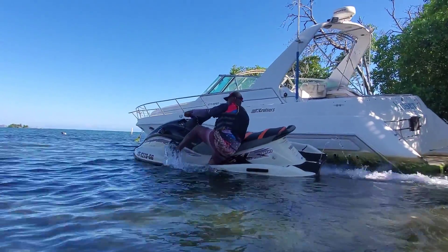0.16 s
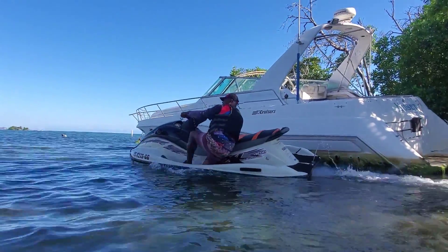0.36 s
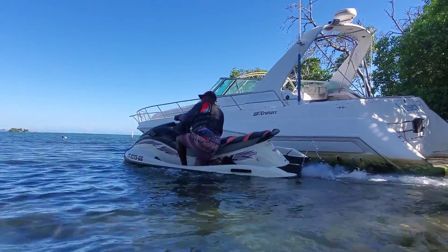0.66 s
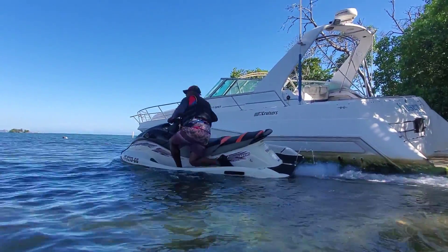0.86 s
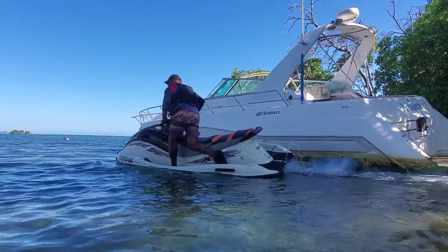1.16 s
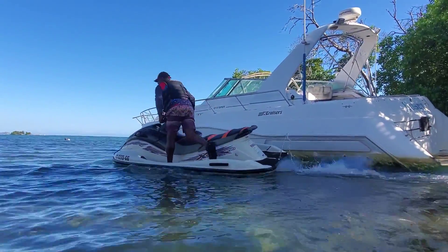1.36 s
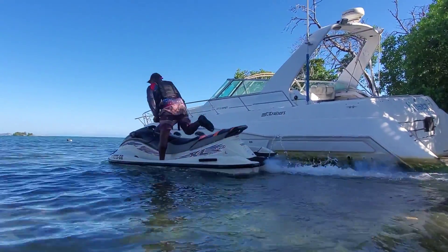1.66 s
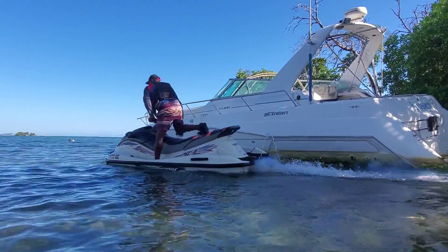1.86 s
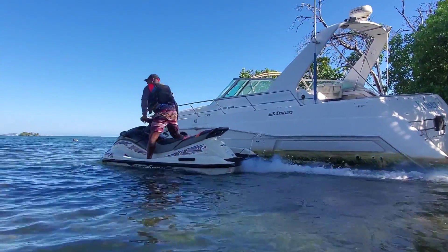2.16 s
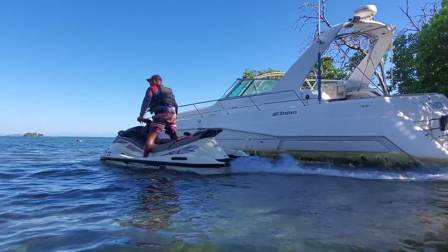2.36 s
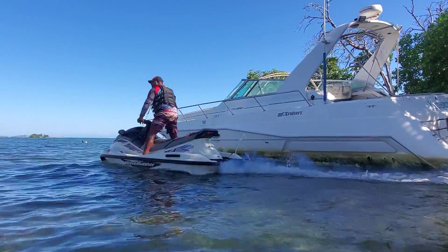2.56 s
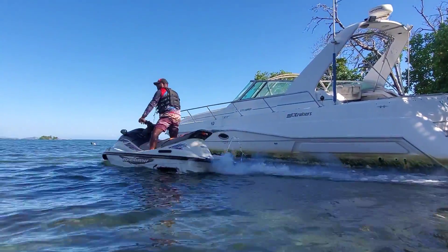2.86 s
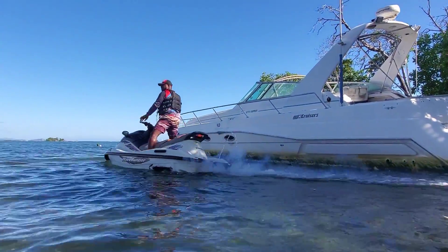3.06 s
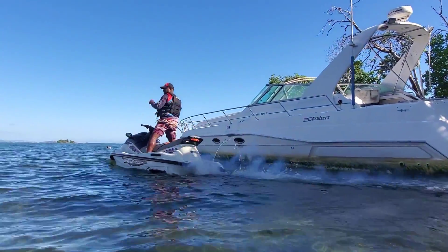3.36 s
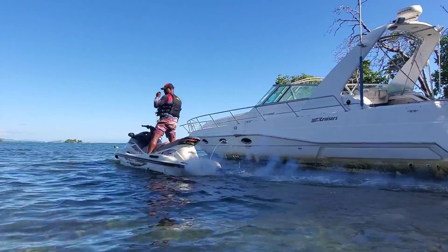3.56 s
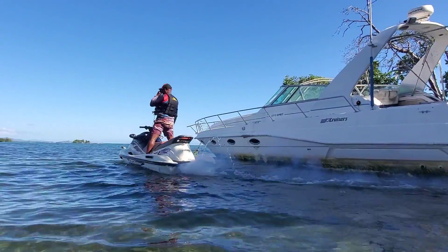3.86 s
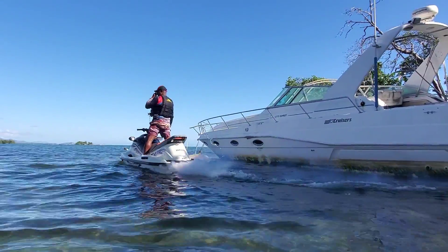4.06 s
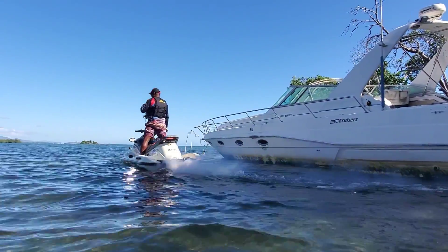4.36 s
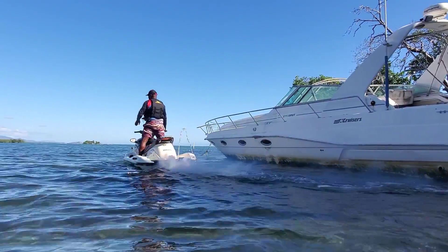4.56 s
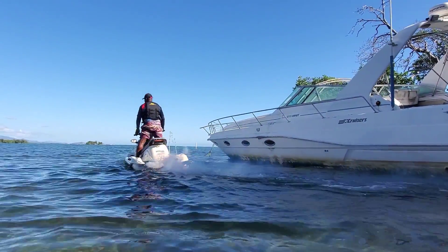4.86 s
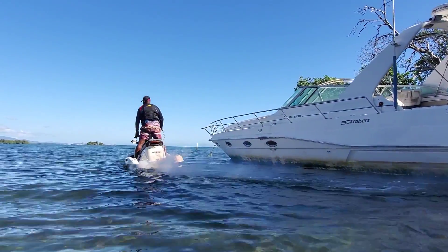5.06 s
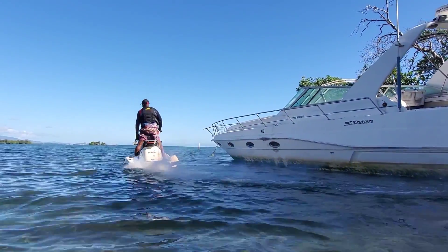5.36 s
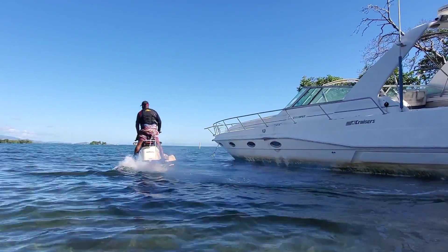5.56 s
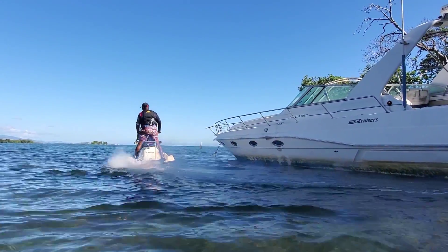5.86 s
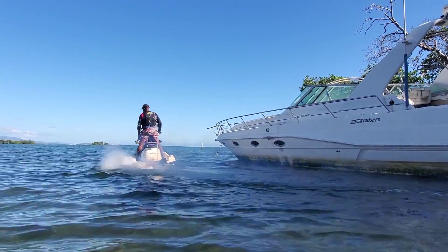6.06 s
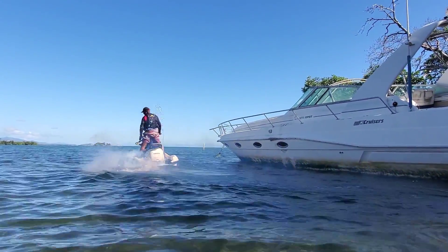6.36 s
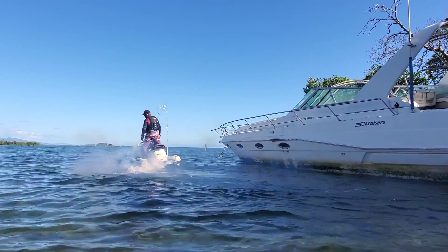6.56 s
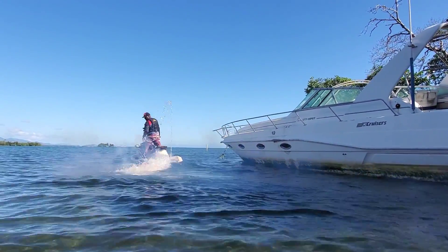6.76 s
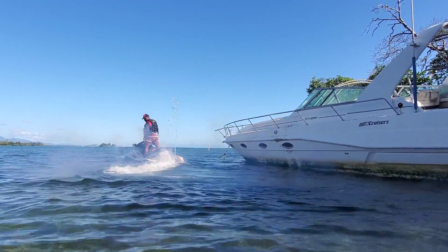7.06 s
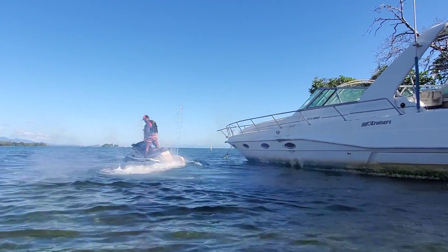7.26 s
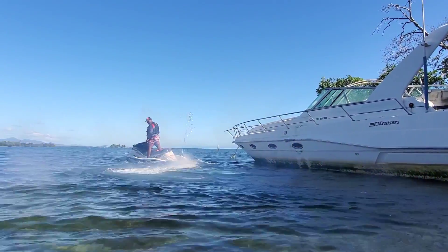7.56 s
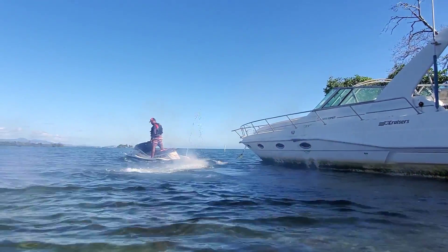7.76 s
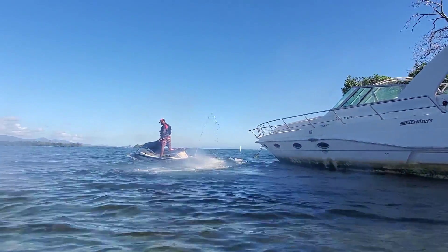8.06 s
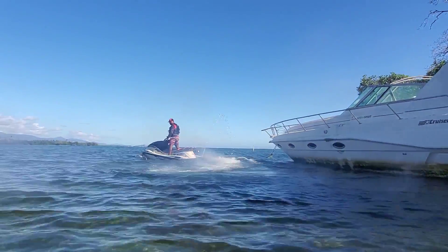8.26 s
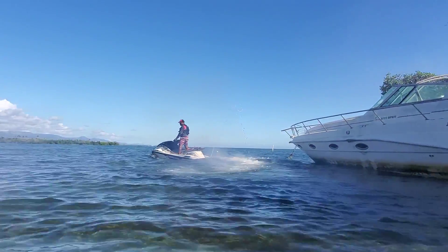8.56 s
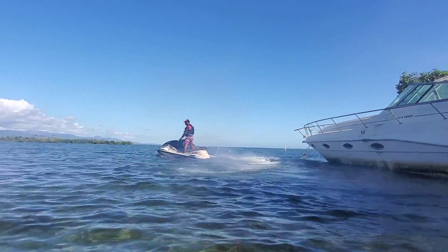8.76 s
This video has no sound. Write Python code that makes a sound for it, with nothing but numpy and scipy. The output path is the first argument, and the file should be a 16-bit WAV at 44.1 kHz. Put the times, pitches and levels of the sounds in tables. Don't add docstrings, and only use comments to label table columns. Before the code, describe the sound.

Outdoors on calm water, low hollow exhaust burps with spluttering wet edges come irregularly over hull rumble and churning jet water. They become even, falter, then race closer together. They blend into a buzzing engine drone with sliding low tones as the craft climbs and recedes; finally its pitch jumps, a whine emerges and hissing spray rises. Close, dry open-air stereo pickup, with a faint reflection off a boat hull.

```python
import sys
import numpy as np
from scipy import signal
from scipy.fft import rfft, irfft, next_fast_len
from scipy.io import wavfile
from scipy.ndimage import uniform_filter1d, minimum_filter1d

SR = 44100
rng = np.random.default_rng(int(sys.argv[2]) if len(sys.argv) > 2 else 0)


def invert_db(x):
    u = np.asarray(x, float) / 20
    return 10 ** u


def waveform_to_disk(signal):
    frames = np.transpose(np.atleast_2d(signal))
    scaled = np.clip(frames, -1, 1) * 32767
    samples = np.round(scaled).astype(np.int16)
    wavfile.write(sys.argv[1], SR, samples)


N = 392931
SIZE = next_fast_len(N + SR // 4)
HZ = np.maximum(np.arange(SIZE // 2 + 1) * SR / SIZE, 1)
STERN_ROUND_S = 1.3
UNDER_LOAD_S = 5.5

# t/s, gas pocket f/Hz, pipe f/Hz, boom level/dB
OUTLET_PATH = [(0, 133.7, 637.4, -7), (1.3, 134.6, 609.5, -7), (1.8, 133.7, 519.5, -3.5),
               (2.702, 143.6, 473, -5), (3.298, 106.2, 454.3, -12), (4.2, 117.4, 474.4, -10.5),
               (4.701, 112.9, 534.6, -6), (5.501, 111.2, 562, -6.5), (6.2, 110, 462, -13.5)]
# t/s, bark level/dB, boom level/dB, splutter level/dB
IDLE_BURPS = [(0.035, -11, -7.5, -23.5), (0.128, -10, -7, -22), (0.249, -16, -4, -28.5),
              (0.332, -13, -2.5, -21), (0.446, -15.5, -6, -22.5), (0.527, -5, -1, -17),
              (0.643, -19.5, -25, -37.5), (0.706, -23, -30, -33.5), (0.747, -16.5, -6, -23.5),
              (0.865, -17, -18, -26), (0.937, -13.5, -38, -28.5), (0.968, -8, -14, -32),
              (1.083, -15, -14.5, -30.5), (1.112, -19, -10, -27.5), (1.185, -17.5, -8.5, -24),
              (1.264, -5, -0.5, -13.5), (1.374, -14, -9.5, -23.5), (1.442, -24, -6, -23),
              (1.463, -10.5, -6, -20.5)]
STUMBLE_BURPS = [(2.741, -11, -9, -18.5), (2.805, -13.5, -10.5, -21), (2.852, -5.5, -8, -27.5),
                 (2.907, -8.5, -15, -24.5), (2.964, -13.5, -32, -25), (3.026, -10, -14, -33.5),
                 (3.064, -5, -9.5, -22), (3.132, -12, -41, -26.5), (3.205, -13, -34, -23.5),
                 (3.255, -25, -20, -29.5), (3.337, -15, -23, -29), (3.394, -16.5, -33, -35),
                 (3.444, -12.5, -17, -50.5), (3.497, -16.5, -23.5, -33.5), (3.557, -17, -13.5, -38.5),
                 (3.649, -8.5, -10.5, -27.5), (3.715, -9.5, -8, -37.5), (3.81, -7.5, -6.5, -32.5),
                 (3.883, -7, -13.5, -30), (3.953, -12.5, -16.5, -27), (4.006, -3, -8.5, -24.5),
                 (4.103, -2.5, -11.5, -25), (4.164, -3.5, -14, -28.5)]
SECOND_KICKS = [
    (2.044, -16.5, -13.5, -25.5),
    (2.154, -10.5, -18, -21),
    (2.322, -8, -24, -27),
]
# t/s, bark level/dB, pipe f/Hz, outlet f/Hz, splutter level/dB re bark
EVEN_BURPS = [(1.572, -16, 556, 1110, -4), (1.643, -7, 583, 1076, -10), (1.722, -11.5, 568, 1060, -6),
              (1.811, -9, 538, 1355, -8.5), (1.884, -8.5, 542, 1190, -12), (1.961, -11.5, 521, 1290, -7),
              (2.063, -12, 491, 1370, -8.5), (2.129, -10, 473, 1350, -11.5), (2.203, -9.5, 501, 1110, -10),
              (2.291, -12.5, 546, 978, -5.5), (2.361, -8, 472, 1220, -15.5), (2.436, -11, 510, 1220, -9),
              (2.518, -11.5, 539, 1030, -7.5), (2.592, -6, 569, 1220, -19.5),
              (2.666, -14.5, 459, 1110, -8.5)]
CHARGE_BURPS = [(4.233, -2.5, 481, 1108, -17), (4.258, -8, 459, 1060, -33), (4.286, -3, 479, 1717, -26),
                (4.335, -7.5, 495, 1157, -23), (4.389, -7, 495, 1076, -10.5), (4.437, -13, 375, 1160, -17),
                (4.488, -8, 496, 1164, -20.5), (4.543, -9.5, 581, 1835, -12),
                (4.597, -11, 629, 1052, -16.5), (4.648, -4, 618, 1100, -20), (4.702, -6.5, 494, 1185, -18),
                (4.759, -12, 495, 1554, -19.5), (4.799, -4.5, 501, 1130, -23),
                (4.859, -5.5, 485, 1595, -17.5), (4.95, -5.5, 487, 1133, -26.5),
                (5.01, -8.5, 617, 1500, -17), (5.102, -5.5, 580, 1110, -17), (5.157, -16.5, 468, 1198, -14),
                (5.195, -10, 572, 1640, -22.5), (5.243, -7, 489.5, 1115, -23.5),
                (5.292, -14.5, 488, 1616, -17.5), (5.35, -8.5, 597, 1232, -25),
                (5.411, -11, 511, 1684, -17.5),
                (5.459, -7, 483, 1800, -22), (5.511, -9, 619, 1450, -28.5), (5.56, -5.5, 488, 1310, -18.5),
                 (5.617, -17, 497, 1384, -18.5), (5.655, -5.5, 683, 1220, -18.5),
                 (5.702, -3.5, 650, 1304, -27), (5.728, -9.5, 608, 1050, -23),
                 (5.765, -4, 597, 1116, -35.5), (5.817, -10.5, 660, 1195, -23),
                 (5.869, -24, 420, 1174, -17.5), (5.895, -16.5, 384, 1205, -15),
                 (5.927, -16, 476, 1345, -20.5), (5.97, -8, 506, 1256, -20), (6.036, -16.5, 511, 1243, -13),
                 (6.092, -12, 393, 1195, -21.5), (6.141, -8.5, 407, 1173, -18.5),
                 (6.186, -18, 419, 1190, -22.5), (6.247, -20, 425, 1220, -13)]


def burp_list():
    path_s, _, _, path_boom_db = np.transpose(OUTLET_PATH)
    burp_rows = [(*row, 0, 0) for row in IDLE_BURPS + STUMBLE_BURPS + SECOND_KICKS]
    for s, bark_db, pipe_hz, outlet_hz, under_db in EVEN_BURPS + CHARGE_BURPS:
        boom_db = np.interp(s, path_s, path_boom_db)
        boom_db += 0.35 * (bark_db + 6) + 2 * rng.standard_normal()
        burp_rows.append((s, bark_db + 0.5, boom_db, bark_db + under_db - 0.3, pipe_hz, outlet_hz))
    return burp_rows


# f/Hz, level/dB per Hz
BARK_COLOUR = [(140, -33), (230, -9.5), (253, -13.5), (280, -13), (323, -8), (351, -6.5), (388, 0),
               (489, -0.5), (719, -2), (790, -8), (890, -20.5), (950, -24), (1240, -44.5), (2090, -120)]
# f/Hz, level/dB per Hz
SPLUTTER_COLOUR = [(500, -31), (850, 3.5), (909, -1.5), (985, 4), (1070, 1.5), (1270, 0), (1330, -1),
                   (1450, -1), (1910, -0.5), (2170, -8.5), (2320, -24), (3040, -19), (3240, -30.5),
                   (3680, -43), (4780, -33.5), (8100, -120)]
# multiple of its pitch, level/dB
POCKET_OVERTONES = [(1.518, -13), (2.201, -24)]
# f/Hz, level/dB re bark
PIPE_MODES = [(288, -18), (705, -13)]
OUTLET_PITCHES = [973, 1023, 1110, 1160, 1220, 1350]


def burps():
    boom, ring, chirp, cracks, knocks, bark_gate, wet_gate, bright_gate = np.zeros((8, N + SR))
    t = np.arange(SR // 9) / SR
    turn = 2 * np.pi * t
    path_s, path_pocket_hz, path_pipe_hz, _ = np.transpose(OUTLET_PATH)
    for s, bark_db, boom_db, wet_db, pipe_hz, outlet_hz in burp_list():
        pitch_z, boom_z, trip_z, hold_z, bend_z, bright_z, *mode_z = rng.standard_normal(8)
        hidden = s < STERN_ROUND_S
        pipe_hz = pipe_hz or np.interp(s, path_s, path_pipe_hz) * (1 + 0.07 * bright_z)
        outlet_hz = outlet_hz or rng.choice(OUTLET_PITCHES)
        start = round(s * SR)
        at = slice(start, start + len(t))

        pocket_hz = np.interp(s, path_s, path_pocket_hz) * (1 + 0.04 * pitch_z)
        bubble = sum(invert_db(db) * np.sin(k * pocket_hz * turn) for k, db in [(1, 0)] + POCKET_OVERTONES)
        boom[at] -= invert_db(boom_db + 0.5) * burst(t, 0.00056, 0.015 + 0.011 * boom_z, 0.087) * bubble

        round_trip = 0.011 + 0.0014 * trip_z
        beats = invert_db(-9 * (t / round_trip % 1))
        trips = np.arange(4)
        knocks[start + (trips * round_trip * SR).astype(int)] -= invert_db(bark_db + 13 - 4 * trips)

        twin_hz = pipe_hz * (1 + 0.11 * np.sign(trip_z))
        pipe = np.sin(pipe_hz * turn) + invert_db(-11) * np.sin(twin_hz * turn)
        ring[at] -= invert_db(bark_db - 5) * burst(t, 0.00062, 0.021 + 0.0028 * hold_z, 0.093) * beats ** 0.92 * pipe
        for (hz, db), chance in zip(PIPE_MODES, mode_z):
            mode_db = bark_db + db + 4.65 * chance
            if hidden and hz < 400:
                mode_db += 6
            mode = np.sin(hz * (1 + 0.032 * bend_z) * turn)
            ring[at] -= invert_db(mode_db) * burst(t, 0.00043, 0.0049, 0.093) * mode

        sliding = np.sin(outlet_hz * turn * (1 + 0.8 * t * bend_z))
        chirp[at] += invert_db(wet_db - 1) * burst(t, 0.0003, 0.013, 0.07) * beats * sliding
        cracks[start] -= invert_db(wet_db + 18)
        bark_gate[at] += invert_db(bark_db - 17) * burst(t, 0.00026, 0.025 + 0.0014 * hold_z, 0.021) * beats
        splutter = invert_db(wet_db - 4.5) * burst(t, 0.0006, 0.016 + 0.005 * hold_z, 0.11) * np.sqrt(beats)
        wet_gate[at] += splutter
        brightness = np.clip(bright_z, -1.5, 1) + (outlet_hz > 1450) - hidden - 0.4
        bright_gate[at] += splutter * invert_db(4.5 * brightness)

    bark = bark_gate[:N] * rng.standard_normal((2, N)) + knocks[:N] * [[1], [0.3]]
    wet = cracks[:N] * [[1], [0.4]]
    for kind, gate in [("low", wet_gate), ("high", bright_gate)]:
        split = signal.butter(2, 1450, kind, fs=SR, output="sos")
        wet = wet + signal.sosfilt(split, gate[:N] * rng.standard_normal((2, N)))
    soften = signal.butter(2, [95, 1400], "band", fs=SR, output="sos")
    tone = signal.sosfilt(soften, boom + ring)[:N] * [[1], [0]] + chirp[:N] * [[1], [0.4]]
    direct = tone + colour(bark, BARK_COLOUR) + colour(wet, SPLUTTER_COLOUR)
    lag = round(0.035 * SR)
    echo = np.pad(direct, ((0, 0), (lag, 0)))[:, :N]
    return direct + invert_db(-12.5) * echo, wet_gate[:N]


# t/s, peak level/dB, f/Hz
IDLE_RINGS = [
    (0.034, -19.5, 960),
    (0.127, -19.5, 870),
    (0.251, -20, 1228),
    (0.331, -19, 953),
    (0.744, -17.5, 950),
    (0.866, -21.5, 1120),
    (0.935, -15, 985),
    (1.371, -21.5, 1120),
]
# t/s, peak level/dB, f/Hz
UPPER_RINGS = [
    (0.128, -27.5, 1760),
    (0.53, -13, 1687),
    (0.748, -24, 2040),
    (1.265, -18, 1824),
    (1.47, -19, 1910),
    (3.659, -25, 1720),
    (5.465, -22, 1856),
]


def outlet_rings():
    return pings(IDLE_RINGS + UPPER_RINGS, width=43, hold=0.014, t60=0.19, trim_db=-8, top_hz=2320)


# t/s, peak level/dB, f/Hz
SNAPS = [(1.2662, -29.5, 3060), (1.6465, -29.5, 3110), (1.7251, -34, 2860), (1.8124, -30.5, 2980),
         (1.8868, -32.5, 3100), (2.1287, -34, 2970), (2.293, -27.5, 3050), (2.437, -31.5, 2900),
         (2.5248, -31.5, 3450), (2.5996, -36.5, 2730), (2.7405, -35.5, 2580), (2.9113, -33.5, 3140),
         (3.2012, -38.5, 2700), (4.167, -37.5, 3230), (4.2343, -35.5, 2600), (4.3861, -27, 3260),
         (4.5448, -37, 3160), (4.7009, -37.5, 2750), (4.797, -40.5, 3130), (4.8485, -32, 3120),
         (4.952, -37.5, 3090), (5.1957, -35.5, 2950), (5.2934, -33.5, 2600),
         (5.8177, -37.5, 2760),
    (5.9381, -39.5, 2930),
    (6.012, -38.5, 2890),
    (6.2218, -41, 2940),
]


def nozzle_snaps():
    return pings(SNAPS, width=260, hold=0.018, t60=0.14, trim_db=-7, top_hz=3900)


# t/s, peak level/dB, f/Hz
POPS = [(6.2542, -25, 1220), (6.2849, -20.5, 1180), (6.3491, -16, 1233), (6.4568, -29, 1330),
        (6.5005, -26.5, 1490), (6.5351, -26.5, 1277), (6.5794, -21.5, 1286), (6.618, -26, 1293),
        (6.6633, -29.5, 1276), (6.7152, -23, 1290), (6.7903, -20.5, 1350), (6.8243, -20.5, 1322),
        (6.852, -20, 1323), (6.899, -23, 1293), (6.943, -23.5, 1330), (6.9892, -25.5, 1340),
        (7.0266, -24, 1276), (7.0581, -22.5, 1275), (7.149, -20.5, 1264), (7.2191, -22.5, 1310),
        (7.353, -28, 1330)]
# f/Hz, width/Hz, level/dB
POP_PARTNERS = [(1900, 47, -9.5), (2867, 100, -21)]


def outlet_pops():
    return pings(POPS, width=51, hold=0.011, t60=0.17, trim_db=-10.5, top_hz=3500, partners=POP_PARTNERS)


# t/s, cycle f/Hz
ENGINE_SPEED = [(5.5, 18.8), (5.9, 20.6), (6.19, 21.5), (6.43, 21.7), (6.92, 22.1), (7.2, 22.0),
                (7.31, 22.3), (7.4, 21.6), (7.71, 21.8), (7.844, 22.3), (8.188, 26.7), (8.286, 26.8),
                (8.434, 26.7), (8.528, 27.3), (8.596, 27.3), (8.744, 26.7), (8.91, 26.6)]
# t/s, throttle level/dB, water box f/Hz, pipe f/Hz
ENGINE_LOAD = [(5.5, 2, 69.46, 540), (5.92, -9.5, 87, 520), (6.2, -3.5, 102, 445), (6.45, 1.5, 116.5, 426),
               (6.75, 2, 129, 510), (7.15, -3.5, 135.7, 538), (7.5, -1, 128.4, 445), (7.72, -3, 152.5, 537),
               (7.92, -3, 132.7, 440), (8.19, 1.5, 151, 461), (8.54, -1.5, 148, 446),
               (8.91, -2, 151.5, 500)]
# t/s, second pipe mode f/Hz, its lift level/dB, outlet f/Hz, outlet level/dB
UPPER_MODES = [(5.5, 683, 8.5, 1190, -51.5), (5.9, 613, 6, 1233, -40.5), (6.3, 656, -3.5, 1214, -36),
               (6.8, 590, 3, 1350, -35.5), (7.05, 684, -8.5, 1294, -35), (7.4, 667, -4, 1336, -38.5),
               (7.8, 733, 3.5, 1274, -46), (8.1, 750, 15, 1264, -34.5), (8.35, 716, 7.5, 1275, -33),
               (8.91, 797, 14, 1314, -32.5)]
FIRING_BEATS = [3, -23, -12.5, -12.5, -9.5, 12]
LOW_ORDERS = [-50.5, -32, -29.5, -30, -29, -27]
BROADSIDE_LIFT = [19, 9.9, 3.5, 5.9, 7.2, 0.56]
# f/Hz, level/dB per Hz
BOX_COLOUR = [(30, -17), (55, 23), (180, 10.5), (215, -7.5), (250, -33.5), (300, -27)]
# f/Hz, width/Hz, level/dB
OUTLET_MODES = [(1250, 94, 2), (1903, 76, -3.5), (2340, 27, -27.5), (2590, 98, -13.5), (2970, 52, -5.5)]


def drone():
    speed, = in_time(ENGINE_SPEED)
    throttle_db, box_hz, pipe_hz = in_time(ENGINE_LOAD)
    upper_hz, upper_db, outlet_hz, outlet_db = in_time(UPPER_MODES)
    swing = broadside()
    hidden_db = 3.5 * swing
    bark_db = -22 + 0.25 * throttle_db - hidden_db
    wet_db = -35 + 1.7 * throttle_db
    cycle = 2 * np.pi * np.cumsum(speed) / SR

    beat = cycle * 6 / (2 * np.pi)
    beat_index = beat.astype(int)
    chance = np.clip(rng.standard_normal(beat_index[-1] + 1), -2, 2)
    gate_db = np.array(FIRING_BEATS)[beat_index % 6] + 1.5 * chance[beat_index] - 8 * (beat % 1)
    gate = rms_one(invert_db(gate_db))

    fringe = orders(cycle, speed, BOX_COLOUR, [], [8, 9, 10, 11], firing_db=0, wander_db=3, shake=0.02)
    boom = invert_db(-30 - hidden_db) * fringe
    masked_db = 5 * (1 - ramp(6.1, 0.27))
    for k, (order_db, broadside_db) in enumerate(zip(LOW_ORDERS, BROADSIDE_LIFT), 2):
        box_db = 9 / (1 + (np.log(k * speed / box_hz) / 0.085) ** 2)
        wander_db = 2.2 * (1 - 0.85 * swing) * drift(2.2)
        level_db = order_db + throttle_db + box_db + wander_db + broadside_db * swing + 3.5 - masked_db
        boom += invert_db(level_db) * np.sin(k * cycle - 0.65 * k * k + 0.2 * drift(4))
    boom += invert_db(1.1 * drift(7.6)) * songs()

    noise_share = 0.15
    pipe_peaks = [(pipe_hz, np.full(N, 9)), (upper_hz, upper_db)]
    pipe = invert_db(bark_db) * np.sqrt(1 - noise_share) * orders(
        cycle, speed, BARK_COLOUR, pipe_peaks, range(13, 35), firing_db=4, wander_db=4.5, shake=0.008)
    outlet_peaks = [(outlet_hz, np.full(N, 12))]
    pipe += invert_db(outlet_db - 3) * orders(
        cycle, speed, SPLUTTER_COLOUR, outlet_peaks, range(38, 60), firing_db=2, wander_db=5, shake=0.014)
    pipe += locks(cycle)
    impeller = invert_db(-42 + 22.5 * ramp(8.05, 0.45) + 2.5 * drift(7)) * np.sin(12 * cycle)

    puffs = gate * rng.standard_normal((2, N))
    bark = invert_db(bark_db) * np.sqrt(noise_share) * colour(puffs, BARK_COLOUR)
    wet = invert_db(wet_db - 11) * colour(puffs, SPLUTTER_COLOUR)
    wet += invert_db(wet_db - 13.5) * resonances(puffs / np.sqrt(gate), OUTLET_MODES)
    return ramp(UNDER_LOAD_S, 0.21) * ((boom + pipe + impeller) * [[1], [0]] + bark + wet)


def orders(cycle, speed, spectrum, peaks, multiples, firing_db, wander_db, shake):
    n = np.arange(round(UNDER_LOAD_S * SR), N)
    m = n[::32]
    out, power = np.zeros(N), 1e-12
    for k in multiples:
        hz = k * speed[m]
        gain_db = at_hz(spectrum, hz) + firing_db * (k % 3 == 0)
        for peak_hz, peak_db in peaks:
            gain_db = gain_db + peak_db[m] / (1 + (np.log(hz / peak_hz[m]) / 0.05) ** 2)
        gain = invert_db(gain_db)
        offset = rng.uniform(0, 2 * np.pi) * (k % 3 > 0)
        wander, wobble = drift(4.3 * 32, size=len(m)), drift(5 * 32, size=len(m))
        level = np.interp(n, m, gain * invert_db(wander_db * wander))
        out[n] += level * np.sin(k * cycle[n] + np.interp(n, m, k * shake * wobble) + offset)
        power = power + gain ** 2 / 2
    return out / np.sqrt(np.interp(np.arange(N), m, power))


# start t/s, end t/s, from f/Hz, to f/Hz, level/dB
BOX_SONGS = [
    (5.6, 6.275, 75, 110.7, -12.5),
    (6.02, 6.366, 142.3, 125.5, -13.5),
    (6.28, 6.558, 95.1, 108.3, -13.5),
    (6.2, 6.629, 159.5, 155.1, -17.5),
    (6.98, 7.329, 162.6, 158.9, -17.5),
    (6.98, 7.249, 91.2, 104, -25),
    (7.55, 7.882, 97.6, 104.7, -16.5),
]


def songs():
    out = np.zeros(N)
    for start, end, from_hz, to_hz, db in BOX_SONGS:
        at = slice(round(start * SR), round(end * SR))
        part = np.linspace(0, 1, at.stop - at.start)
        phase = 2 * np.pi * np.cumsum(from_hz + (to_hz - from_hz) * part) / SR
        out[at] += invert_db(db + 0.5) * np.sqrt(np.sin(np.pi * part).clip(0)) * np.sin(phase)
    return out


# middle t/s, half length t/s, order, level/dB
ORDER_LOCKS = [(5.95, 0.094, 25, -32.5), (6.372, 0.11, 19, -19.5), (6.806, 0.03, 27, -21),
               (7.126, 0.072, 15, -36), (7.47, 0.057, 21, -42.5), (7.76, 0.028, 24, -22),
               (8.088, 0.093, 18, -29), (8.118, 0.12, 28, -27), (8.381, 0.045, 36, -35.5),
               (8.822, 0.11, 40, -39.5), (8.787, 0.12, 28, -33.5)]


def locks(cycle):
    out, seconds = np.zeros(N), np.arange(N) / SR
    for s, half, k, db in ORDER_LOCKS:
        at = slice(round((s - 2 * half) * SR), round((s + 2 * half) * SR))
        swell = np.exp(-((seconds[at] - s) / half) ** 2)
        out[at] += invert_db(db + 3) * swell * np.sin(round(k) * cycle[at])
    return out


# t/s, level/dB
JET_THRUST = [(0, 5.5), (0.9, 2.5), (1.25, 5), (1.7, 4), (2.4, 2), (3.0, 3), (3.35, 1), (3.72, -2),
              (4.14, 6.5), (4.4, 4), (5.3, 2.5), (5.7, 4.5), (6.75, 2.5), (7.6, 8.5), (8.0, 8), (8.5, 7),
              (8.91, 5.5)]
# f/Hz, level/dB per Hz
RUMBLE_COLOUR = [(15, -65), (25, -53.5), (51, -3), (129, 2), (172, -3), (204, -8.5), (248, -28), (291, -11),
                 (320, -29.5), (420, -46.5), (700, -120)]
# f/Hz, level/dB per Hz
WASH_COLOUR = [(1060, -22), (1800, -13.5), (2010, -23), (2160, -5.5), (2550, -1), (2700, -2.5), (3040, 1),
               (3680, -6), (4780, -42), (8100, -120)]
# f/Hz, level/dB per Hz
SPRAY_LEFT = [(3000, -22.5), (4200, 3.5), (6300, -7), (7600, -31), (9300, -2.5), (10500, -30.5),
              (12500, -24.5), (14500, -46.5)]
# f/Hz, level/dB per Hz
SPRAY_RIGHT = [(3000, -29), (4200, 0.5), (6500, 2.5), (8000, -15), (9800, 6), (12200, 7.5), (13300, -5.5),
               (14800, -29.5)]


def wake(thrown):
    thrust_db, = in_time(JET_THRUST)
    seconds, swing_db = np.arange(N) / SR, 10.5 * broadside()
    churn_db = -32.5 + 1.19 * seconds + thrust_db
    wash_db = -58.5 + 0.44 * thrust_db + swing_db
    spray_db = -58.5 - 0.7 * seconds + 0.6 * thrust_db + swing_db
    rumble_db = -21 + 0.93 * thrust_db - 10 * ramp(6.2, 0.41)

    drum = colour(rng.standard_normal(N), RUMBLE_COLOUR)
    thin = signal.sosfilt(signal.butter(3, 75, "high", fs=SR, output="sos"), drum)
    near = seconds < 2.7
    rumble = invert_db(rumble_db) * np.where(near, drum, thin) * [[1], [0.15]]

    churn = colour(rng.standard_normal((2, N)), BARK_COLOUR)
    churn *= (1 - 0.95 * ramp(6.38, 1)) * invert_db(churn_db - 7 + 2 * drift(13))
    swish = colour(rng.standard_normal((2, N)), SPLUTTER_COLOUR)
    swish *= (1 - 0.5 * ramp(3.8, 0.37)) * invert_db(churn_db - 20.5 + 2.5 * drift(25))

    sizzle_db = -38 + 2.6 * thrust_db + 12 * ramp(STERN_ROUND_S, 0.13)
    sizzle = invert_db(wash_db + 1.5 * drift(9)) + thrown * invert_db(sizzle_db)
    wash = colour(sizzle * rng.standard_normal((2, N)), WASH_COLOUR)

    landed = rng.random((2, N)) < 400 / SR
    droplets = invert_db(4 * np.minimum(rng.exponential(1, (2, N)), 4)) * landed
    puffs = invert_db(spray_db + 2 * drift(6.3)) * (0.5 + 8 * thrown)
    left, right = puffs * (1 + 1.7 * droplets) * rng.standard_normal((2, N))
    spray = [colour(left, SPRAY_LEFT), invert_db(6.5) * colour(right, SPRAY_RIGHT)]
    return rumble + churn + swish + wash, np.array(spray)


# f/Hz, share
PORT_LIKENESS = [(60, 0.998), (190, 0.96), (330, 0.71), (590, 0.83), (1030, 0.98), (1830, 0.75),
                 (3230, 0.6), (5000, 1)]
# f/Hz, level/dB
PORT_LEAN = [(60, -.2), (150, -0.5), (350, 0), (800, -.3), (1330, 2.5), (2070, 2.5), (3230, -4)]
# f/Hz, phase/rad
PORT_LEAD = [(0, 0), (860, -0.16), (1120, 0.7), (1380, -1.0), (1720, -0.7), (1980, -0.8), (2580, -.9),
             (2840, -0.8), (3100, 0.5), (3360, 0.24)]
# t/s, left lag/samples
CRAFT_BEARING = [(0, 6.0), (1.5, 5), (3.7, 0.5), (5.7, -4), (7.2, -2), (7.7, 5), (8.2, 0), (8.9, 1)]


def ports(common, unlike):
    alike, lean = np.clip(at_hz(PORT_LIKENESS, HZ), 0, 1), at_hz(PORT_LEAN, HZ) / 2
    mid = np.sqrt((1 + alike) / 2) * rfft(common, SIZE)
    side = np.sqrt((1 - alike) / 2) * rfft(unlike, SIZE)
    lead = np.exp(1j * np.interp(HZ, *np.transpose(PORT_LEAD)))
    left, right = irfft([(mid + side) * invert_db(lean) * lead, (mid - side) * invert_db(-lean)], SIZE)[:, :N]
    n = np.arange(N)
    lag, = in_time(CRAFT_BEARING)
    return np.array([np.interp(n - 9 - lag, n, left), np.interp(n - 9, n, right)])


def pings(rows, width, hold, t60, trim_db, top_hz, partners=()):
    out, t = np.zeros((2, N + SR)), np.arange(SR // 11) / SR
    settle = 600
    for s, db, hz in rows:
        peaks = [(hz, width, 0)]
        for partner_hz, partner_width, partner_db in partners:
            peaks.append((partner_hz * rng.normal(1, 0.015), partner_width, partner_db + rng.normal(0, 3)))
        ringing = resonances(rng.standard_normal((2, len(t) + settle)), peaks)[:, settle:]
        at = round(s * SR)
        out[:, at:at + len(t)] += invert_db(db + trim_db) * burst(t, 0.0006, hold, t60) * ringing
    return signal.sosfilt(signal.butter(4, top_hz, fs=SR, output="sos"), out[:, :N] + 1e-18)


def resonances(x, peaks):
    out = 0
    for k, (hz, width, db) in enumerate(peaks):
        r = np.exp(-np.pi * width / SR)
        poles = [1, -2 * r * np.cos(2 * np.pi * hz / SR), r * r]
        out = out + (-1) ** k * invert_db(db) * signal.lfilter([1 - r * r, 0, r * r - 1], poles, x)
    return rms_one(out)


def colour(x, spectrum):
    taps = 8192
    hz = np.maximum(np.arange(taps // 2 + 1) * SR / taps, 1)
    cepstrum = irfft(np.log(invert_db(at_hz(spectrum, hz))))
    cepstrum[1:taps // 2] *= 2
    cepstrum[taps // 2 + 1:] = 0
    pulse = irfft(np.exp(rfft(cepstrum)))
    return irfft(rfft(x, SIZE) * rfft(pulse / np.linalg.norm(pulse), SIZE), SIZE)[..., :N]


def at_hz(points, hz):
    point_hz, level = np.transpose(points)
    return np.interp(np.log(hz), np.log(point_hz), level)


def in_time(rows):
    s, *columns = np.transpose(rows)
    return [np.interp(np.arange(N) / SR, s, c) for c in columns]


def ramp(start, length):
    return np.clip((np.arange(N) / SR - start) / length, 0, 1)


def broadside():
    return ramp(7.83, 0.88)


def burst(seconds, rise, hold, t60):
    return (1 - np.exp(-seconds / rise)) * invert_db(-60 * np.maximum(seconds - hold, 0) / t60)


def drift(rate, size=N):
    r = np.exp(-80 * np.pi * rate / SR)
    slow = signal.lfilter([1], [1, -2 * r, r * r], rng.standard_normal(size // 40 + 2002))[2000:]
    return np.interp(np.arange(size) / 40, np.arange(len(slow)), rms_one(slow))


def rms_one(x):
    return x / np.sqrt(np.mean(x ** 2) + 1e-20)


def scene():
    exhaust, thrown = burps()
    rings = outlet_rings() + nozzle_snaps() + outlet_pops()
    engine = drone()
    water, spray = wake(thrown)
    return ports(*(exhaust + rings + engine + water)) + spray


def top_cut(x):
    return signal.sosfilt(signal.butter(12, 14700, fs=SR, output="sos"), x)


def record(dry):
    dry = signal.sosfilt(signal.butter(3, 48, "high", fs=SR, output="sos"), dry)
    room = np.minimum(1, 0.98 / (np.abs(dry).max(axis=0) + 1e-9))
    limiter = uniform_filter1d(minimum_filter1d(room, size=129), size=65)
    ending = 1 - ramp(8.905, 0.0057)
    return top_cut(dry * ending * limiter)


dry = scene()
out = record(dry)
waveform_to_disk(out)
```